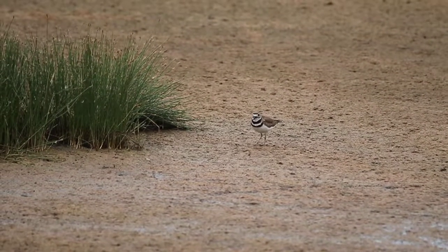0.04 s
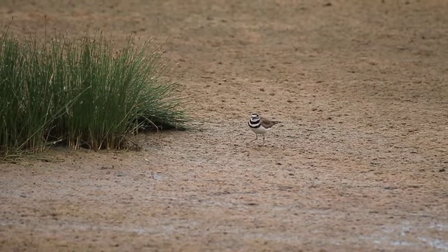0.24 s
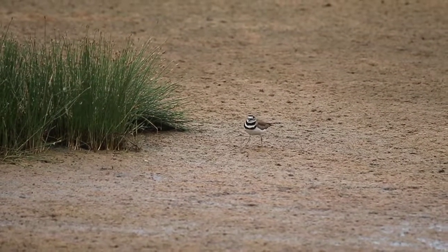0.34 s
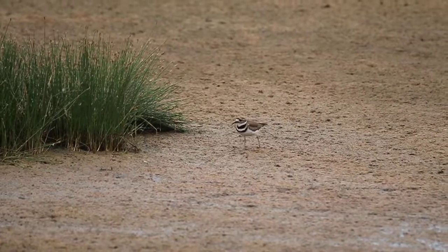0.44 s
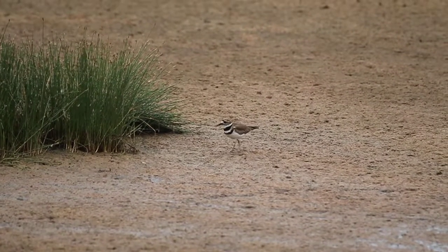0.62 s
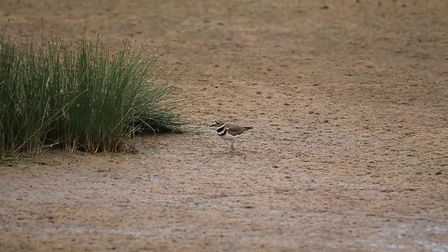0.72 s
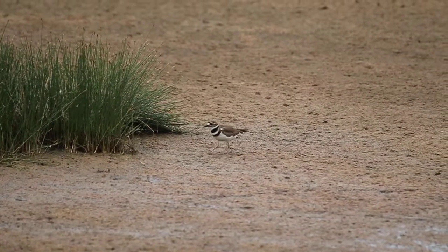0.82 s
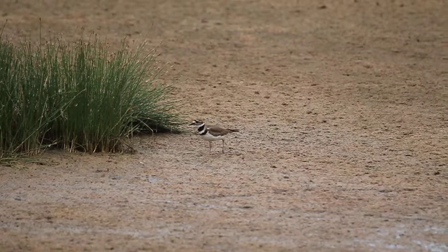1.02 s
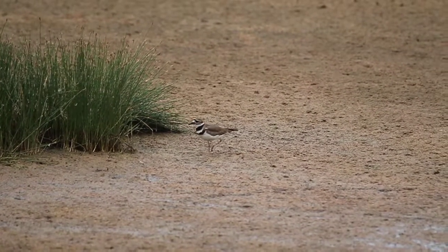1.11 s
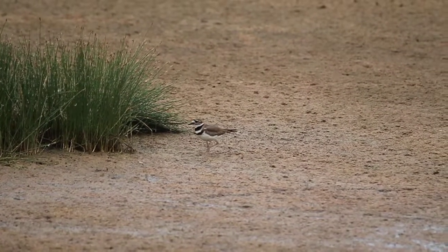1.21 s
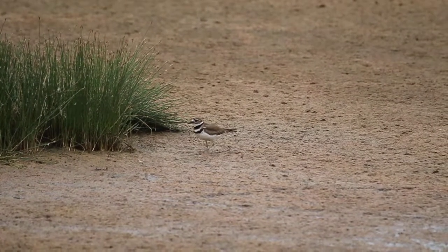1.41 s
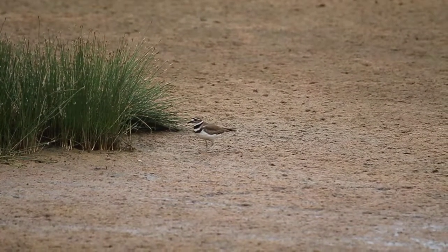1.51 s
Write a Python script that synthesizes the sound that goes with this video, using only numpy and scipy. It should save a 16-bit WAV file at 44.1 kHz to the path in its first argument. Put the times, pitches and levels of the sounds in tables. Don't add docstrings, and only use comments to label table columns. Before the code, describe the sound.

A plover pipes one short clear whistle, then wind thumps the microphone over open mud flats.

```python
import sys
import numpy as np
from scipy import signal
from scipy.fft import rfft, irfft
from scipy.io import wavfile
from scipy.ndimage import uniform_filter1d

SR = 44100
rng = np.random.default_rng(int(sys.argv[2]) if len(sys.argv) > 2 else 0)


def store_pcm(level_fs):
    pcm = np.round(np.clip(level_fs, -1, 1) * 32767).astype(np.int16)
    wavfile.write(sys.argv[1], SR, np.atleast_2d(pcm).T)


def gain_from_decibels(decibels):
    exponent = np.asarray(decibels, float) / 20
    return 10 ** exponent


N = 68355


def filtered_noise(gain):
    x = irfft(rfft(rng.standard_normal(N)) * gain, N)
    return x / np.std(x)


def shaped(points):
    hz, db = np.array(points, float).T
    f = np.maximum(np.fft.rfftfreq(N, 1 / SR), 1)
    return filtered_noise(gain_from_decibels(np.interp(np.log(f), np.log(hz), db)))


def throat(hz, width_hz):
    f = np.fft.rfftfreq(N, 1 / SR)
    return filtered_noise(1 / (1 + (2 * (f - hz) / width_hz) ** 2) ** 2)


def walk(rate):
    k = int(SR / rate)
    held = np.repeat(rng.standard_normal(N // k + 1), k)
    x = uniform_filter1d(uniform_filter1d(held, k), k)[:N]
    return (x - x.mean()) / x.std()


def ramp(t, start, rise):
    return np.sin(np.pi / 2 * np.clip((t - start) / rise, 0, 1)) ** 2


# t/s, f/Hz, level/dB
CALL_PATH = [
    (.104, 4050, -52),
    (.109, 4025, -47),
    (.116, 3985, -44),
    (.13, 3905, -46.5),
    (.143, 3835, -42),
    (.165, 3797, -42.2),
    (.182, 3772, -43),
    (.197, 3828, -45.5),
    (.206, 3800, -60),
]


def plover(t):
    s, hz, db = np.array(CALL_PATH).T
    edge_s, echo_db, echo_t60_s = .0025, -26, .35
    pitch = np.interp(t, s, hz) * (1 + .0008 * walk(98))
    phase = np.pi * np.cumsum(pitch) / SR
    env = np.sqrt(2) * gain_from_decibels(np.interp(t, s, db) + .5 * walk(82))
    env = env * ramp(t, s[0], edge_s) * ramp(-t, -s[-1], edge_s)

    first = gain_from_decibels(-9) * ramp(t, .119, .01) * ramp(-t, -.216, .032) * np.sin(phase)
    second = np.sin(2 * phase)
    third = gain_from_decibels(-38) * np.sin(3 * phase)
    fourth_db = -23 - 60 * np.clip(t - s[0], 0, 1)
    fourth = gain_from_decibels(fourth_db) * np.sin(4 * phase)
    call = env * (first + second + third + fourth)

    tail = rng.standard_normal(N // 4) * gain_from_decibels(-60 * t[:N // 4] / echo_t60_s)
    echo = signal.fftconvolve(call, tail / np.linalg.norm(tail))[:N]
    return call + gain_from_decibels(echo_db) * echo


# t/s, f/Hz, spread/cycles, peak level/dB
PUSHING_EDDIES = [(0.146, 90, 0.62, -44.5), (0.1679, 80, 0.76, -41.5), (0.232, 83, 0.86, -44),
                  (0.242, 44.6, 0.83, -42), (0.2541, 110, 1.35, -31), (0.2877, 68, 1.5, -35.5),
                  (0.424, 62, 0.29, -33.5), (0.433, 132, 0.34, -23.5), (0.469, 140, 1.3, -35),
                  (0.522, 196, 0.26, -13.5), (0.545, 136, 0.67, -27), (0.6085, 108.6, 0.42, -17),
                  (0.6371, 93, 1.5, -32), (0.64, 165, 1.24, -29), (0.645, 173.5, 0.28, -14),
                  (0.6443, 323, 0.52, -31), (0.6785, 63.3, 1.2, -40), (0.7047, 180, 0.36, -30),
                  (0.829, 39.2, 0.93, -57), (0.835, 109, 1.2, -40.5), (0.8934, 163, 0.93, -40.5),
                  (0.9215, 56, 0.42, -55), (0.9244, 116.6, 0.43, -27.5), (0.9679, 113, 0.77, -39.5),
                  (1.0571, 40, 1.2, -55), (1.111, 108, 1.6, -39.5), (1.124, 208.7, 0.98, -26.5),
                  (1.133, 239, 0.52, -29), (1.201, 105, 0.5, -37)]
# t/s, f/Hz, spread/cycles, peak level/dB
PULLING_EDDIES = [(0.013, 44.4, 0.17, -48), (0.2098, 68, 0.25, -29), (0.247, 172, 0.85, -33),
                  (0.28, 180, 1.86, -39.5), (0.2924, 133.4, 1.7, -34.5), (0.3065, 95, 1.7, -44),
                  (0.3313, 55.6, 0.74, -42.5), (0.456, 98, 1.7, -42.5), (0.4785, 34, 1.6, -45.5),
                  (0.518, 64.5, 0.57, -33.5), (0.5279, 121, 0.38, -14), (0.5334, 148, 0.22, -16.5),
                  (0.56, 84.6, 0.66, -19.5), (0.5652, 111, 0.28, -23), (0.613, 54, 0.6, -28.5),
                  (0.649, 233, 0.98, -37), (0.6827, 40.5, 0.78, -41.5), (0.7101, 121, 0.66, -22.5),
                  (0.7214, 65, 0.61, -33), (0.8633, 68, 0.29, -33), (0.8758, 125, 0.29, -24.0),
                  (0.9012, 108, 1.5, -35), (0.9755, 49, 0.36, -36.5), (1.009, 67.5, 1.1, -51),
                  (1.0764, 52, 0.89, -43.5), (1.1147, 226, 1.2, -39.5), (1.1284, 126, 0.97, -22),
                  (1.288, 60.4, 0.49, -50), (1.369, 59.6, 0.35, -51)]
# t/s, level/dB
GUST_LEVEL = [(0, -59), (.08, -67), (.13, -58.5), (0.199, -55), (.36, -66), (.4, -57), (.45, -54.5),
              (.72, -53), (.76, -74), (.81, -54.5), (0.901, -48), (1.0, -62), (1.12, -53.5), (1.22, -57.5),
              (1.25, -66), (1.3, -67), (1.4, -70), (1.5, -67)]
# f/Hz, level/dB (per Hz)
RUMBLE_COLOUR = [(20, 2.5), (45, 0), (90, -2), (150, -4.5), (250, -7), (400, -50), (1500, -110)]


def wind(t):
    thumps = np.zeros(N)
    for way, eddies in ((1, PUSHING_EDDIES), (-1.01, PULLING_EDDIES)):
        for s, hz, cycles, db in eddies:
            turn = 2 * np.pi * hz * (t - s)
            bell = np.exp(-.5 * (turn / (2 * np.pi * cycles)) ** 2)
            swing = bell * np.cos(turn)
            net_push = bell * swing.sum() / bell.sum()
            thumps += way * gain_from_decibels(db) * (swing - net_push)
    strength = 2 * uniform_filter1d(thumps ** 2, size=300)
    crest_hiss = gain_from_decibels(-12) * strength * throat(330, 350)

    s, db = np.array(GUST_LEVEL).T
    rumble_db = 3 + np.interp(t, s, db) + 2.5 * walk(34.53)
    return thumps + crest_hiss + gain_from_decibels(rumble_db) * shaped(RUMBLE_COLOUR)


# f/Hz, width/Hz, level/dB, flicker/dB
FROG_THROATS = [(241, 82, -67, 0.5), (339.4, 84, -61.5, 2), (451.2, 58, -59.5, 2), (498, 44, -60.5, 1.5),
                (568.7, 135, -62, 1.5), (682, 264, -64.5, -0.5), (1466, 440, -71.5, 1.5),
                (3500, 1400, -78, 2.5)]
# t/s, level/dB
CHORUS_SWELL = [(0, 2), (.16, 2.5), (.35, 0), (.55, 1.5), (.75, -3), (1.0, 3), (1.12, 6.5), (1.23, -3.5),
                (1.3, 2.5), (1.38, -2.5), (1.45, 7.5), (1.5, -8.5), (1.55, 3.5)]
# t/s, f/Hz, length/s, level/dB
FAR_PIPS = [(.11, 2850, .005, -64), (.281, 1450, .008, -63), (.851, 3800, .004, -68),
            (.218, 1470, .008, -62), (.235, 1470, .014, -63.5), (.315, 1500, .012, -61),
            (.475, 3450, .006, -67), (.616, 3480, .008, -60.5), (.627, 3430, .007, -64),
            (.693, 1500, .006, -60), (.695, 3400, .006, -67), (.763, 1420, .007, -62),
            (.761, 3400, .008, -67), (.942, 1450, .01, -62), (1.003, 1450, .01, -62),
            (1.084, 1420, .024, -57), (1.302, 1450, .01, -63), (1.354, 2850, .01, -62.5),
            (1.383, 1700, .005, -59), (1.45, 1480, .007, -62), (.526, 620, .014, -47),
            (.557, 480, .016, -50), (.607, 480, .02, -47), (.694, 450, .016, -50),
            (1.4168, 3410, .013, -53), (1.431, 3380, .005, -64), (1.44, 1420, .007, -61)]


def chorus(t):
    out = np.zeros(N)
    for hz, width_hz, db, flicker_db in FROG_THROATS:
        out += gain_from_decibels(db + flicker_db * walk(40.2)) * throat(hz, width_hz)
    s, swell_db = np.array(CHORUS_SWELL).T
    out *= gain_from_decibels(np.interp(t, s, swell_db))

    grain_db = 1.3 * walk(250)
    for s, hz, length, db in FAR_PIPS:
        env = np.sqrt(2) * gain_from_decibels(db + grain_db) * np.exp(-(2 * (t - s) / length) ** 4)
        out += env * np.sin(2 * np.pi * hz * t + rng.uniform(0, 2 * np.pi))
    return out


# start t/s, end t/s, top f/Hz, sag f/Hz, level/dB
FAR_WHISTLES = [
    (.868, .922, 4200, 750, -67),
    (.89, .927, 3360, 100, -66.5),
]


def far_birds(t):
    start_s, rise_s, fade_s = 1.332, .01, .011
    fade = np.exp(-np.maximum(t - start_s - 2.3 * rise_s, 0) / fade_s)
    out = gain_from_decibels(-59) * ramp(t, start_s, rise_s) * fade * throat(4500, 2400)
    for start, end, hz, sag_hz, db in FAR_WHISTLES:
        u = np.clip((t - start) / (end - start), 0, 1)
        pitch = hz - sag_hz * (u - .33) ** 2
        env = ramp(t, start, 0.0044) * ramp(-t, -end, 0.0035) * gain_from_decibels(1.2 * walk(140.4))
        out += np.sqrt(2) * gain_from_decibels(db) * env * np.sin(2 * np.pi * np.cumsum(pitch) / SR)
    return out


# f/Hz, level/dB (per Hz)
AIR_COLOUR = [(25, -37), (170, -23), (300, -12), (520, -9), (820, -18.5), (2000, -26), (12500, -35),
              (15700, -39.5)]


def air(t):
    whine = gain_from_decibels(-85) * np.sin(2 * np.pi * 15734 * t)
    return gain_from_decibels(-54) * shaped(AIR_COLOUR) + whine


def scene():
    t = np.arange(N) / SR
    return (plover(t) + wind(t) + chorus(t) + far_birds(t) + air(t))[None]


def low_pass(x):
    return signal.sosfilt(signal.butter(12, 15770, fs=SR, output="sos"), x)


def record(dry):
    return low_pass(dry)


dry = scene()
out = record(dry)
store_pcm(out)
```